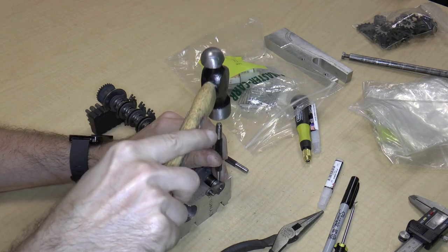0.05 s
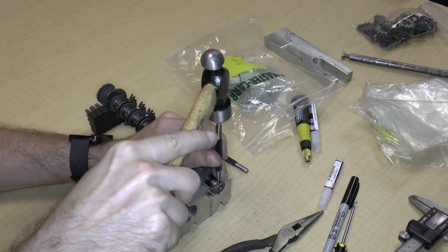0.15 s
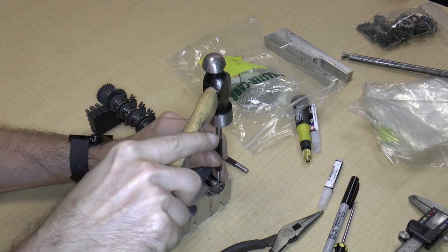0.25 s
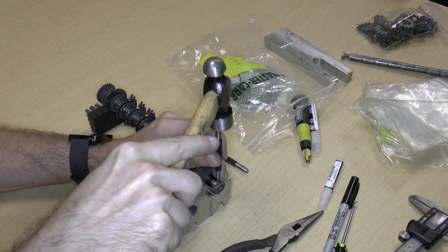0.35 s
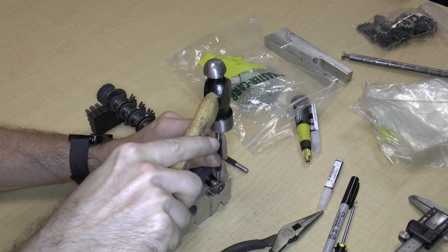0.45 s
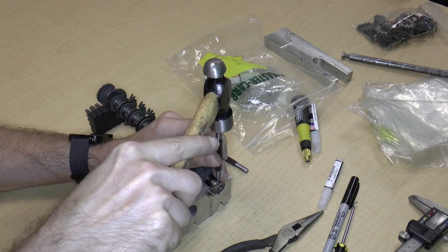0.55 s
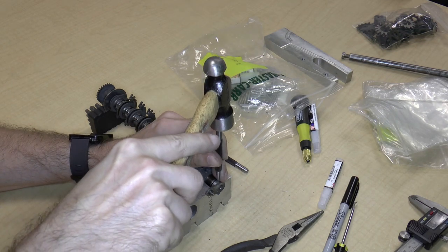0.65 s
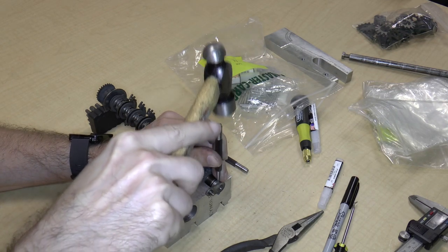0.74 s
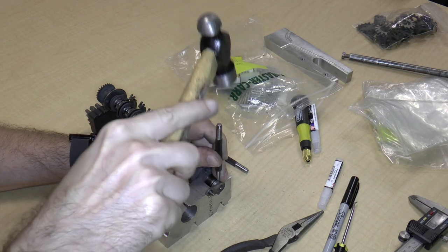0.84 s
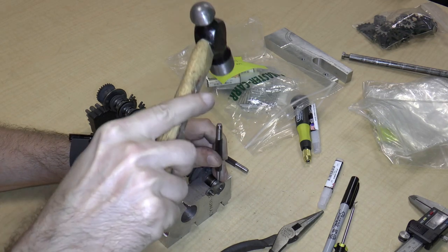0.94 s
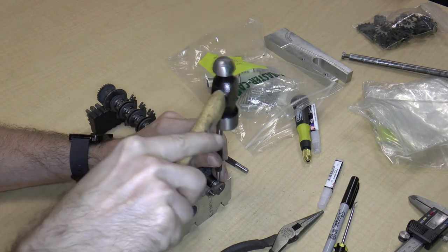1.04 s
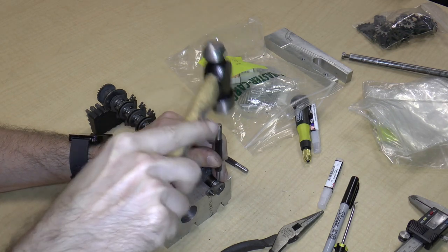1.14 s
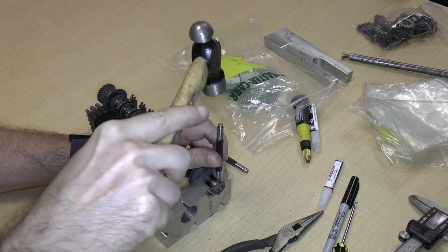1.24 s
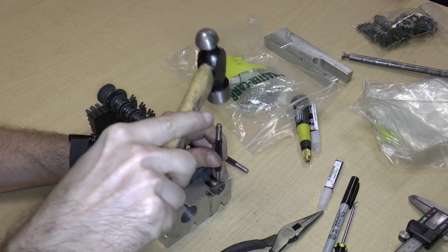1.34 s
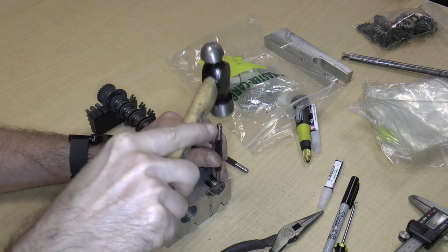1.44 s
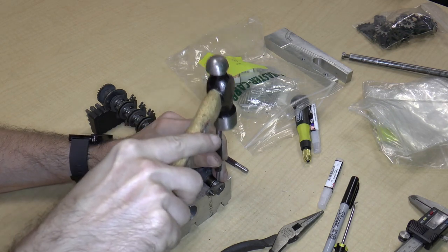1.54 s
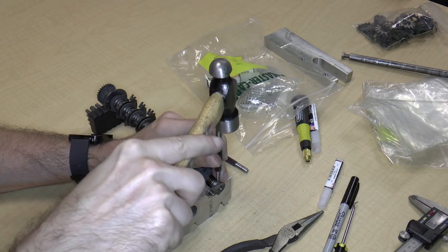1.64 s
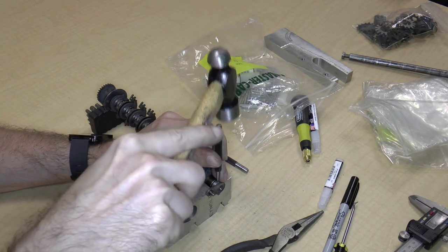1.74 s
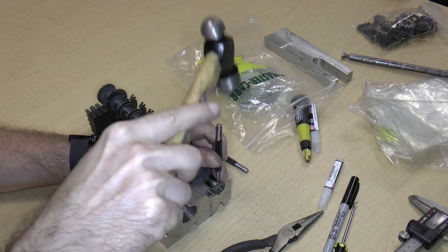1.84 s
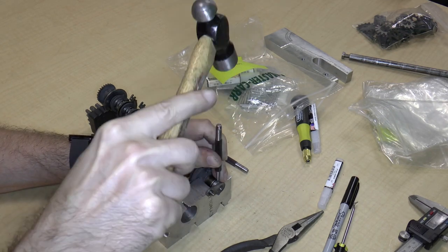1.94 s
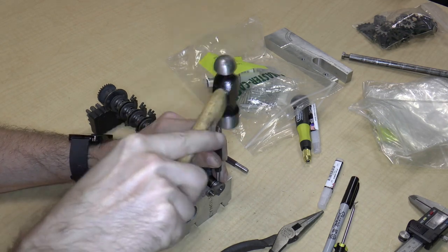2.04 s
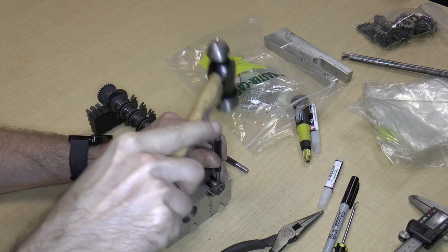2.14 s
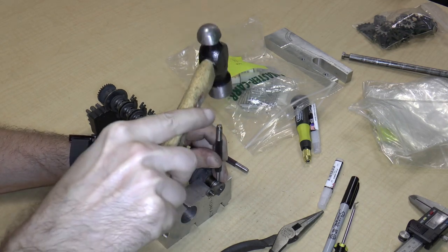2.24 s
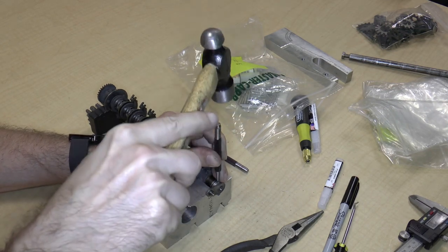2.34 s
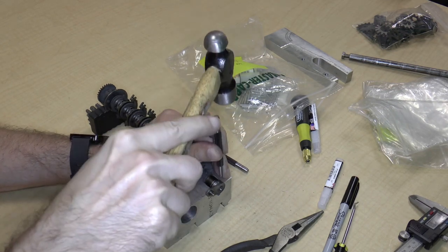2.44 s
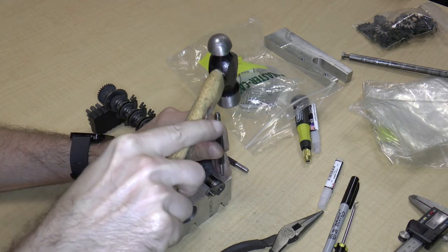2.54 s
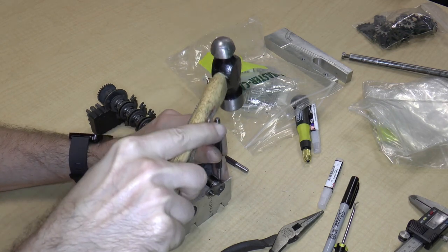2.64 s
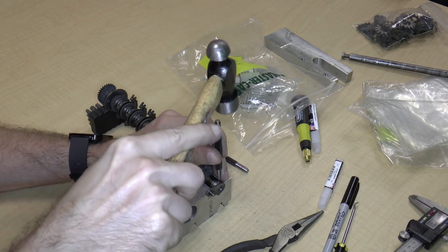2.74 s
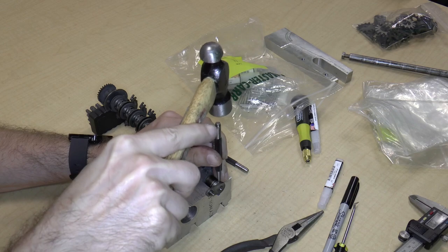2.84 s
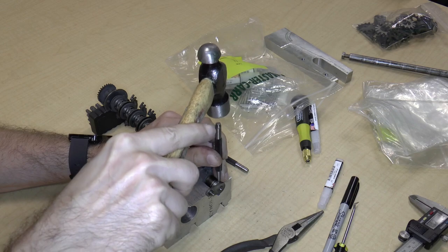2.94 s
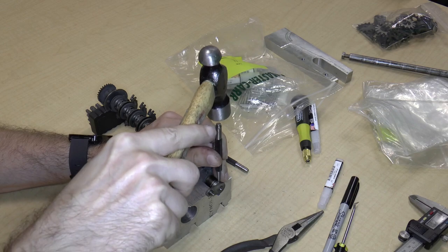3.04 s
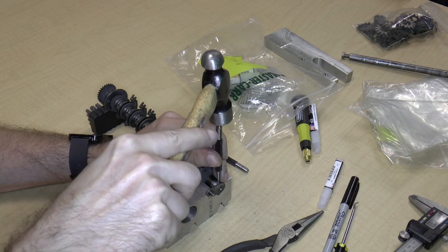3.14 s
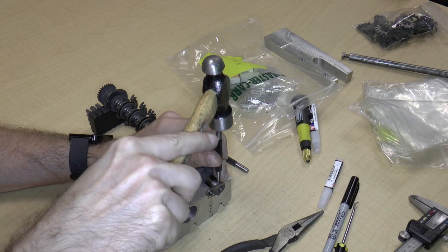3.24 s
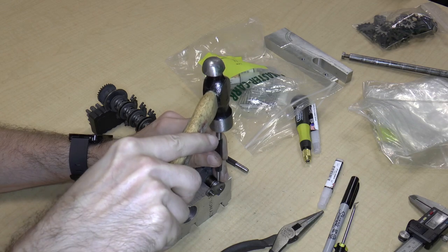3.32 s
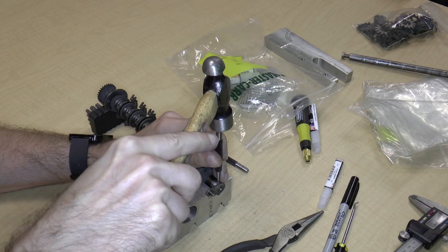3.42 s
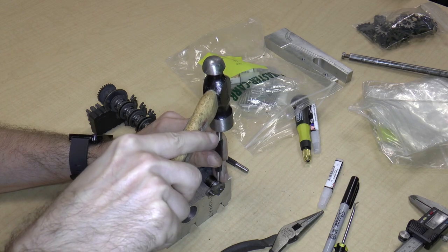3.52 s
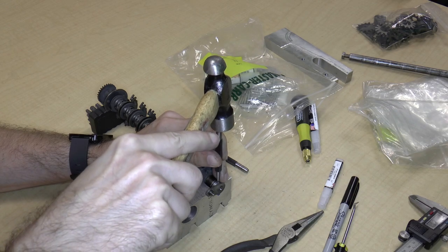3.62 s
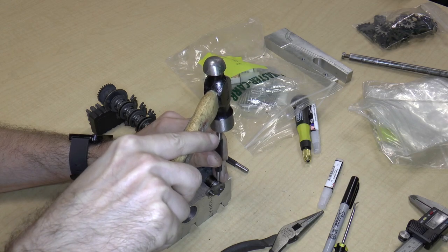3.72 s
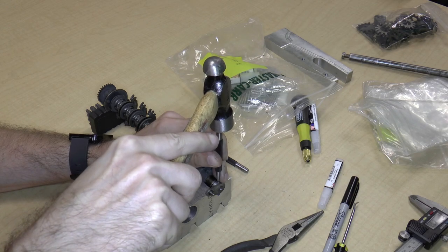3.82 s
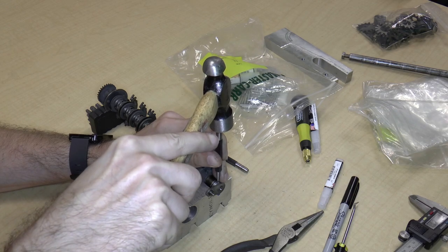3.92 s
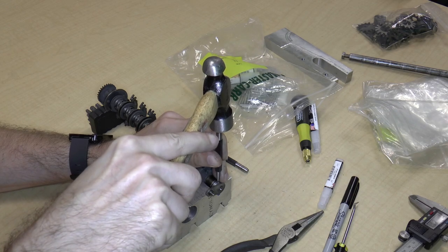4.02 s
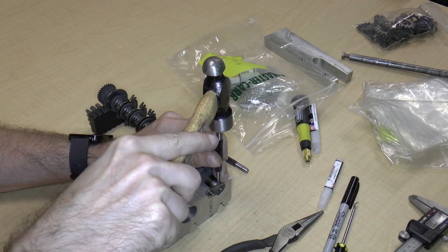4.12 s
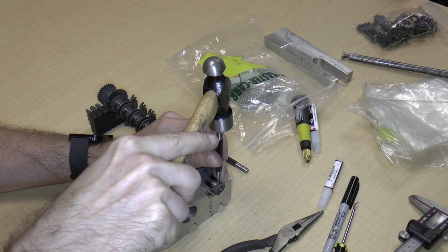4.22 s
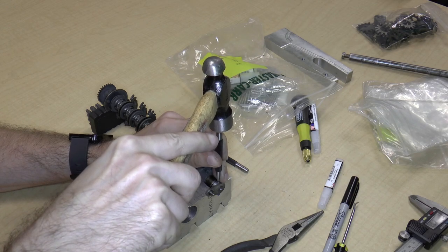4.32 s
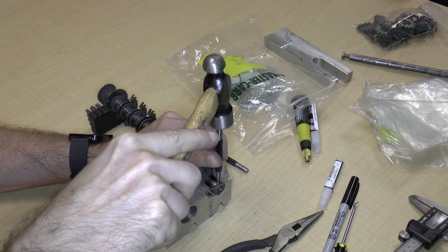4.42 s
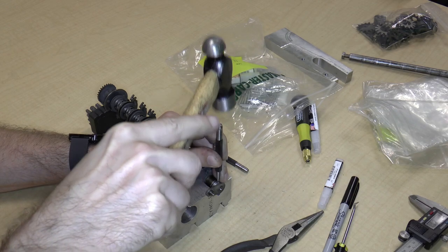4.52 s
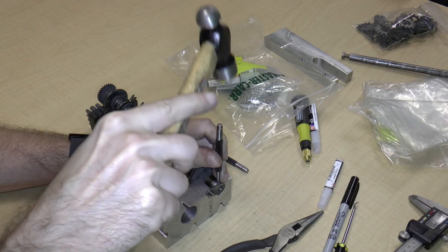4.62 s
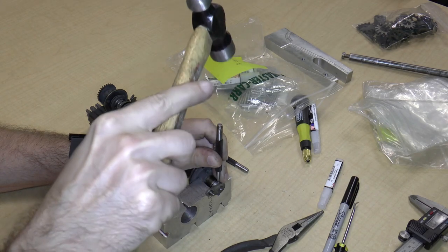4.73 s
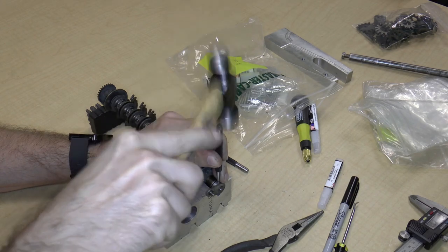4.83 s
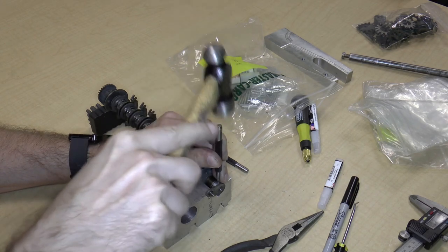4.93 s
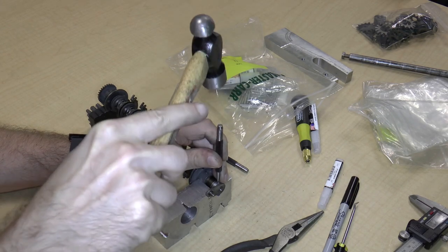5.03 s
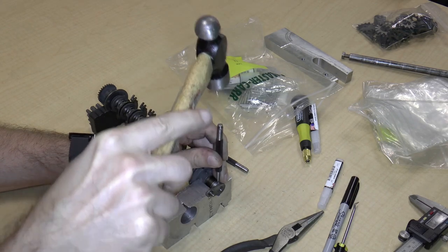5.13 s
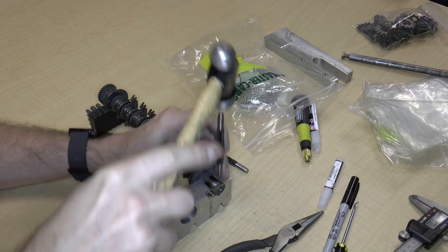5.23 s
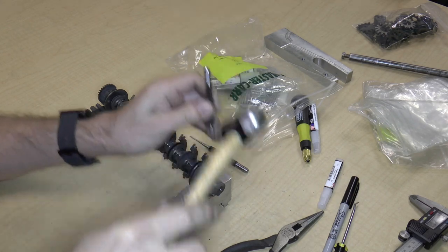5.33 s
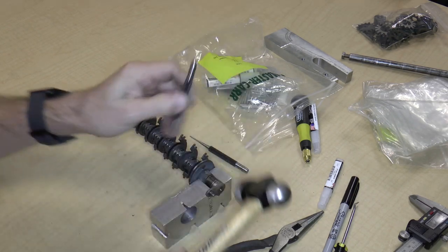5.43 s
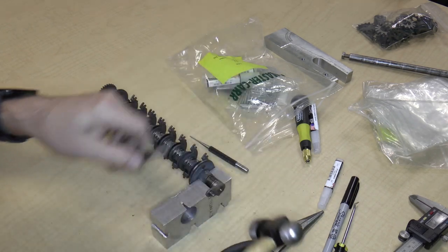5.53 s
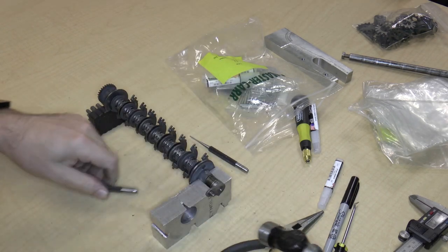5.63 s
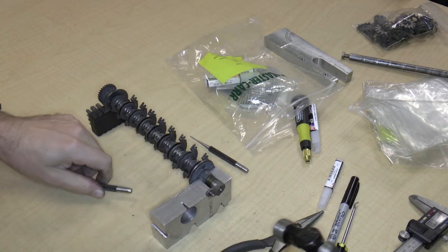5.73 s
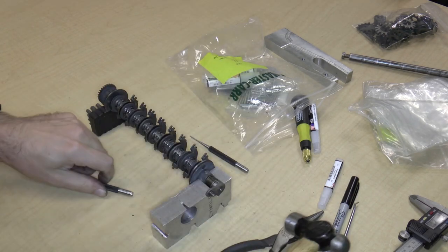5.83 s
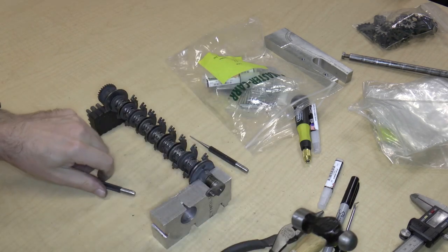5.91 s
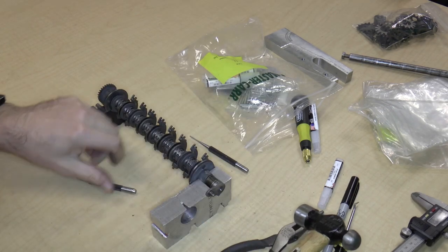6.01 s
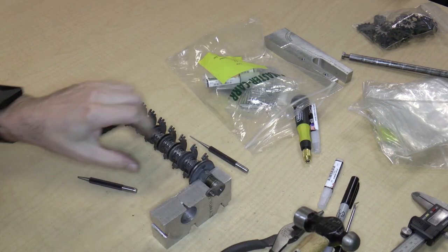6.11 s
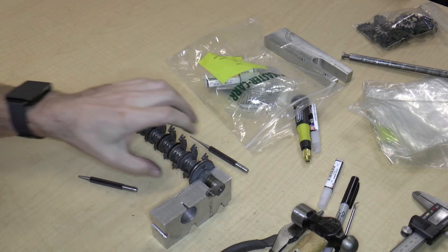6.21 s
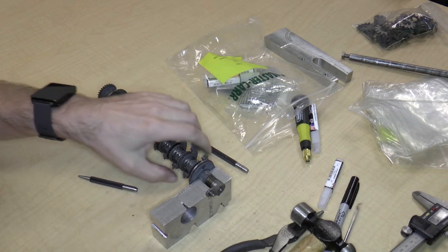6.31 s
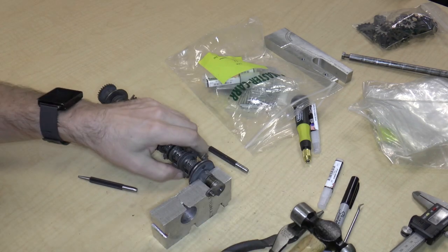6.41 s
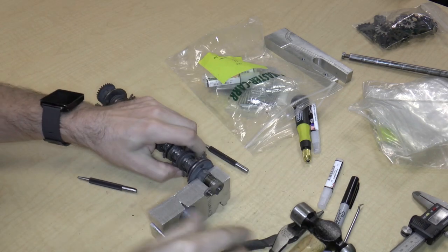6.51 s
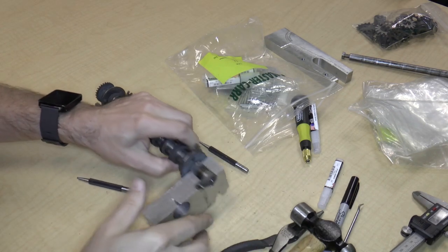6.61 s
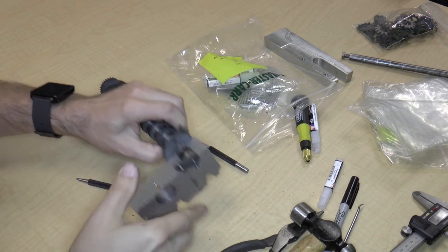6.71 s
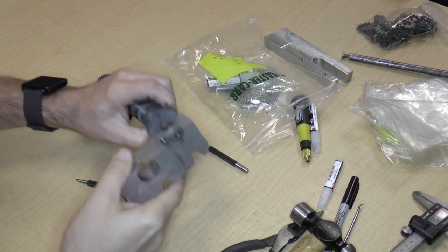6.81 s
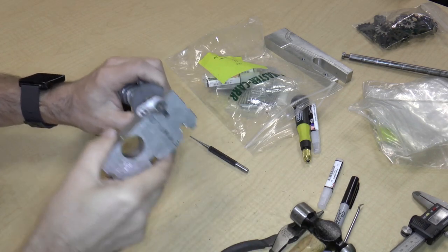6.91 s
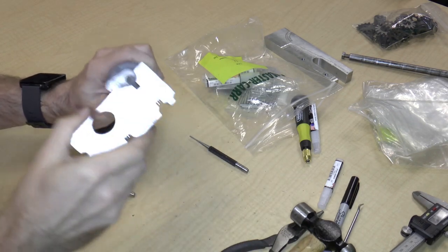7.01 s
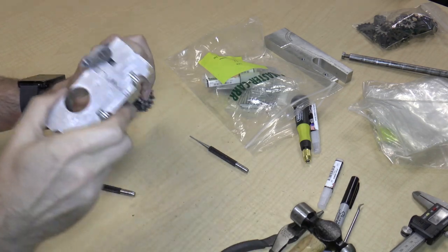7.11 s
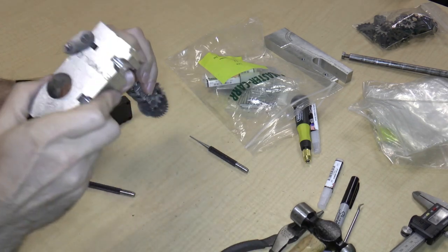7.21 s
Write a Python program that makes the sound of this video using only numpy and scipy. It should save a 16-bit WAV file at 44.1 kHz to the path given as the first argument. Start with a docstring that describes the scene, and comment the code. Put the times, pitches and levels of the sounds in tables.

```python
"""Hammer and pin punch at a workbench

Taps and three heavy blows of a ball hammer drive a steel pin punch into a part on a metal block: noise snaps,
damped modes of block, punch, head and bench, and a noise crash; the heavy blows overload the input.
Tools are laid down as clacks and thumps, a steel piece sings, small contacts tick.
A hard-walled workshop answers each contact with decaying noise over steady ventilation rumble and hiss.
"""
import sys
import numpy as np
from scipy import signal
from scipy.fft import rfft, irfft, next_fast_len
from scipy.io import wavfile

SR = 44100
rng = np.random.default_rng(int(sys.argv[2]) if len(sys.argv) > 2 else 0)


def output_pcm(signal):
    """Save a mono or channel-first signal as 16-bit PCM at the path in sys.argv[1].

    Samples are clipped to [-1, 1] before scaling.
    """
    pcm = np.clip(np.atleast_2d(signal).T, -1, 1) * 32767
    wavfile.write(sys.argv[1], SR, np.round(pcm).astype(np.int16))


N = 320166


def hammer():
    """Each blow snaps steel on steel, knocks the block, rings punch and head and shakes the bench."""
    # blows; the weakest only rests the head on the punch: [t/s, force/dB, snap brightness/dB, punch ring/dB]
    blows = [(0.475, -15.5, 1.5, -21), (1.101, 9.5, -1.5, -13), (1.6417, -7, -6.5, -14.5),
             (2.1, 10, 0, -14), (3.3441, -11.5, 8.5, -20), (3.736, -39, 0, -65), (4.903, 10, 4, -12)]
    # block and bench top: [f/Hz, level/dB, t60/s]
    block_modes = [(150, -24.5, 0.054), (246, -17, 0.032), (564, -2, 0.013), (731.5, -0.5, 0.0079),
                   (1060, -0.5, 0.0071), (1320, -2.5, .011), (1690, -2.5, 0.0096), (2210, -3.5, 0.0045),
                   (2386, -8, 0.0078), (2900, -14, 0.0055)]
    # punch, damped by the fingers: [f/Hz, level/dB, t60/s]
    punch_modes = [(4300, -12, .004), (5200, -6, .013), (5900, -3, .004), (6500, 0, .005), (7200, -7, .004)]
    # hammer head: [f/Hz, level/dB, t60/s]
    head_modes = [(8100, -8, .007), (9200, -4, .003), (10300, -10, .008), (10800, -6, .004),
                  (11280, -6, .022), (12300, -8, .004), (13900, -18, .02)]
    # booming bench top: [f/Hz, level/dB, t60/s]
    bench_modes = [(257.7, -3.5, 0.67), (301.2, -0.5, 0.65), (351.6, -7, 0.6)]
    # everything loose on the bench jumps: [f/Hz, relative level/dB per Hz]
    crash_spectrum = [(50, -45), (85, -24), (120, -9), (190, -8), (285, -8), (420, -11), (600, -3.5),
                      (1400, -4.5), (3500, -13.5), (7000, -27.5), (11500, -29.5), (15500, -51)]
    # (level/dB at force 0, dB gained per dB of force)
    snap_law, head_law, crash_law = (-17.5, 1.4), (-17, 2.54), (-12, 2.443)
    knock_top_db, room_db = -7, -2  # the held block's force gain stops at knock_top_db

    out = np.zeros((2, N))
    t = np.arange(SR // 2) / SR
    for start_s, force_db, bright_db, punch_db in blows:
        snap_db, head_db, crash_db = (
            db + gain * force_db for db, gain in (snap_law, head_law, crash_law))
        knock = amp(min(force_db, knock_top_db)) * ringing(block_modes, t, scatter_db=1.0)
        snap = amp(snap_db + bright_db) * puff(t, hump(6500, slope_db=3.5), t60_s=0.015)
        # paired gains: direct sound, push into the shop; small steel sounds are mostly direct
        punch = amp(punch_db) * ringing(punch_modes, t, scatter_db=4) * amp([[0], [-8]])
        head = amp(head_db) * ringing(head_modes, t, scatter_db=2.5)
        crash = puff(t, lambda hz: amp(along(crash_spectrum, hz)), t60_s=0.03)
        boom = amp(-23.5) * ringing(bench_modes, t, scatter_db=3.0)
        boom = boom * [[1], [0]]  # right under the microphone, heard dry
        steel = punch + (snap + head) * amp([[0], [-4]])
        add(out, start_s, knock + steel + amp(crash_db) * (crash + boom), room_db)
    return out


def tools():
    """Tools laid on the bench clack, thump and rock a little; one steel piece sings on."""
    # contacts: [t/s, thump level/dB, thump centre f/Hz, clack level/dB, clack centre f/Hz]
    laid = [(5.9113, -38.5, 910, -30.5, 3220), (5.924, -30.5, 960, -43.5, 2870),
            (6.0138, -19.5, 1330, -14, 4200), (6.0847, -22.5, 1230, -23, 2360),
            (6.2013, -22.5, 420, -29, 7100), (6.2857, -35.5, 500, -37.5, 7040),
            (6.3483, -18, 600, -33.5, 3870), (6.3619, -18.5, 386, -41, 2492),
            (6.3834, -21.5, 610, -21.5, 5200), (6.5906, -41.5, 664, -60, 5200),
            (6.7068, -39, 230, -65, 3500)]
    # the laid hammer knocks a loose steel tool: [t/s, level/dB, swell/s]
    head_drop = (6.015, -28, 0.071)
    # modes of that singing tool: [f/Hz, level/dB, t60/s]
    singing_modes = [(5916, 2, 0.4), (13850, -17, .4)]
    # a laid tool rocks twice more within chatter_s, weaker
    chatter_s, chatter_db, room_db = 0.045, -13, -2.5

    out = np.zeros((2, N))
    t = np.arange(SR // 10) / SR
    for start_s, thump_db, thump_hz, clack_db, clack_hz in laid:
        clack = amp(clack_db) * puff(t, hump(clack_hz, slope_db=17.5), t60_s=0.01)
        clack = clack * amp([[0], [-8]])  # mostly heard direct
        thump = amp(thump_db) * puff(t, hump(thump_hz, slope_db=8.5), t60_s=0.035)
        delays_s = np.append(0, chatter_s * rng.random(size=2))
        rocks = repeats(clack + thump, delays_s, [0, chatter_db, chatter_db])
        add(out, start_s, rocks, room_db)

    start_s, level_db, swell_s = head_drop
    t = np.arange(SR // 2) / SR
    singing = amp(level_db) * ringing(singing_modes, t, scatter_db=3.0)
    singing = singing * (1 - np.exp(-(t / swell_s) ** 2))
    add(out, start_s, singing, wet_db=-16)
    return out


def ticks():
    """Tiny bright contacts as short noise: the clear ones, and faint ones scattered while the hands work."""
    # small bright ticks, the first a rebound after a blow: [t/s, level/dB, centre f/Hz]
    clear_ticks = [(0.5095, -51, 6300), (5.336, -38.5, 7050), (5.3614, -49, 7470), (5.4094, -50, 7510),
                   (5.4694, -52, 7900), (5.615, -51.5, 9000), (5.6233, -48.5, 6760), (6.5889, -52.5, 5200),
                   (6.6526, -41.5, 7090), (6.6756, -36, 5500), (6.7007, -52.5, 3465), (7.03, -45, 4060),
                   (7.035, -43, 7020), (7.169, -48.5, 4190), (7.173, -47, 8960)]
    # hands at work: [from t/s, to t/s]
    handling = [(5.39, 5.61), (6.5, 6.9)]
    faint_db, faint_scatter_db, faint_hz = -59, 6, 7400

    out = np.zeros((2, N))
    t = np.arange(SR // 20) / SR

    def tick(centre_hz):
        """One short bright noise contact."""
        return puff(t, hump(centre_hz, slope_db=7), t60_s=0.0094)

    for start_s, level_db, centre_hz in clear_ticks:
        add(out, start_s, amp(level_db) * tick(centre_hz), wet_db=-8)
    for start_s, end_s in handling:
        contact = tick(faint_hz)
        delays_s = rng.uniform(0, end_s - start_s, size=10)
        levels_db = rng.normal(faint_db, faint_scatter_db, size=10)
        add(out, start_s, repeats(contact, delays_s, levels_db), wet_db=-2)
    return out


def air():
    """Steady rumble and hiss: coloured noise, less alike left and right in the treble."""
    # ventilation and microphone hiss: [f/Hz, relative level/dB per Hz]
    air_spectrum = [(12, -28), (20, 0), (66, -7), (93, -13), (145, -8), (176, -20.5), (253, -15.5),
                    (325, -29), (467, -29.5), (817, -38.5), (965, -35), (1210, -40.5), (1430, -41.5),
                    (2710, -49), (15700, -59.5)]
    # [f/Hz, left-right likeness]
    hiss_alike = [(1400, 1), (3100, 1), (5200, 1), (15000, .35)]
    rms_db = -44
    noise = filtered(rng.standard_normal((2, N)), lambda hz: amp(along(air_spectrum, hz)))
    return amp(rms_db) * unit(spread(noise, hiss_alike))


def add(out, start_s, sound, wet_db):
    """Places a direct sound and a fresh answer of the shop to its push; near walls die fast, far hall slowly."""
    # base decay, sped up for the walls and slowed for the hall below: [f/Hz, base t60/s]
    shop_decay = [(70, 1), (280, 0.87), (600, 0.52), (1300, 0.66), (3000, 0.67), (7000, .62), (11400, 0.43),
                  (12500, .2), (15000, 0.063)]
    # relative strength of the answer: [f/Hz, level/dB]
    wall_strength = [(70, -2), (190, -3), (290, 6), (1000, 0.5), (3000, -2.5), (6000, -7), (12000, 1)]
    # sound from all sides: [f/Hz, left-right likeness]
    diffuse_alike = [(3000, 1), (4200, .98), (5500, .87), (12000, .82)]

    direct, push = np.broadcast_to(sound, (2, sound.shape[-1]))
    hz, t, z = signal.stft(rng.standard_normal((2, SR)), SR, nperseg=512)
    fade_db = -60 * t / along(shop_decay, hz)[:, None]
    near_walls, far_hall = amp(1.78 * fade_db), amp(0.9 * fade_db - 15)
    gain = amp(along(wall_strength, hz)[:, None]) * np.hypot(near_walls, far_hall)
    tail = spread(signal.istft(z * gain, SR, nperseg=512)[1], diffuse_alike)
    # reflections thicken over the first walls
    tail = tail * (1 - np.exp(-np.arange(tail.shape[1]) / SR / 0.0033))
    wet = amp(wet_db) * signal.fftconvolve(push[None], tail / np.linalg.norm(tail[0]), axes=1)
    wet[:, :len(direct)] += direct
    part = out[:, round(start_s * SR):][:, :wet.shape[1]]
    part += wet[:, :part.shape[1]]


def ringing(modes, t, scatter_db):
    """Damped sines of random strength, neighbours in opposite phase, rising over the contact time."""
    ring = 0
    for k, (hz, level_db, t60_s) in enumerate(modes):
        decay = amp(level_db + rng.normal(0, scatter_db) - 60 * t / t60_s)
        ring = ring + (-1) ** k * decay * np.sin(2 * np.pi * hz * t)
    return ring * (1 - np.exp(-(t / 0.00044) ** 2))


def puff(t, response, t60_s):
    """Quickly dying coloured noise, and its energy as one smooth push, since many walls average out its grain."""
    decay = amp(-60 * t / t60_s)
    noise = unit(filtered(rng.standard_normal(len(t)), response)) * decay
    noise = noise * (1 - np.exp(-t / 0.0004))
    push = filtered(signal.unit_impulse(len(t), SR // 300), response)
    return np.array([noise, push * np.linalg.norm(decay) / np.linalg.norm(push)])


def hump(centre_hz, slope_db):
    """Broad band falling towards slope_db/octave each side and rolling off steeply above about 12.5 kHz."""
    def response(hz):
        """Gain at each frequency."""
        octaves = np.log2((hz + 1) / centre_hz)
        return amp(-slope_db * np.sqrt(octaves ** 2 + 0.16)) / (1 + (hz / 12500) ** 8)
    return response


def repeats(sound, delays_s, levels_db):
    """Copies of a sound at the given delays and strengths."""
    train = np.bincount((delays_s * SR).astype(int), amp(levels_db))
    return signal.fftconvolve(sound, train[None], axes=1)


def spread(pair, alike):
    """Two unrelated noises become left and right with the given likeness, as mid plus and minus side."""
    def mid_side(hz):
        """Mid and side gains; the cosine of twice the angle is the likeness."""
        angle = np.arccos(np.clip(along(alike, hz), 0, 1)) / 2
        return np.array([np.cos(angle), np.sin(angle)])

    mid, side = filtered(pair, mid_side)
    return np.array([mid + side, mid - side])


def filtered(x, response):
    """x times a complex response of frequency."""
    n = x.shape[-1]
    m = next_fast_len(n + 4096)
    return irfft(rfft(x, m) * response(np.fft.rfftfreq(m, 1 / SR)), m)[..., :n]


def along(points, hz):
    """(f/Hz, value) points interpolated on a log frequency axis."""
    f, v = np.transpose(points)
    return np.interp(np.log(hz + 1), np.log(f + 1), v)


def unit(x):
    """x scaled to an rms of 1."""
    return x / np.sqrt(np.mean(x ** 2) + 1e-20)


def amp(db):
    """Amplitude factor of a level in dB."""
    return 10 ** (np.asarray(db) / 20)


def scene():
    """Sum of blows, laid tools, ticks and air."""
    return hammer() + tools() + ticks() + air()


def record(dry):
    """Two close ports, an input stage that flattens overloads, a band limit."""
    # the left port leads in the treble: [f/Hz, phase lead/rad]
    lead = [(2600, 0), (4000, .12), (5200, .58), (8200, 1.12), (11400, 1.62), (15500, 2.3)]
    ceiling, top_hz = 0.985, 15850
    ports = filtered(dry, lambda hz: np.exp([[.5j], [-.5j]] * along(lead, hz)))
    flat = ports / (1 + np.abs(ports / ceiling) ** 8) ** (1 / 8)
    return filtered(flat, lambda hz: 1 / (1 + (hz / top_hz) ** 100))


dry = scene()
out = record(dry)
output_pcm(out)
```